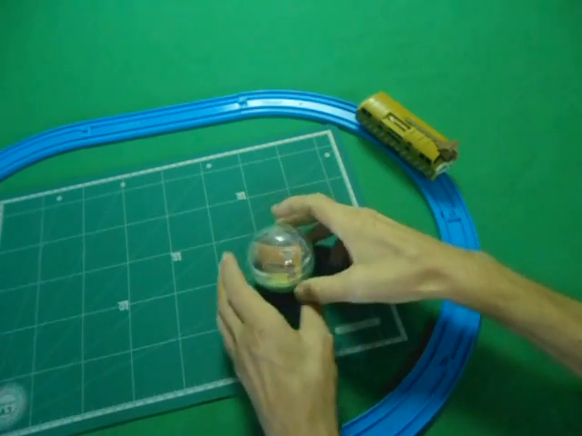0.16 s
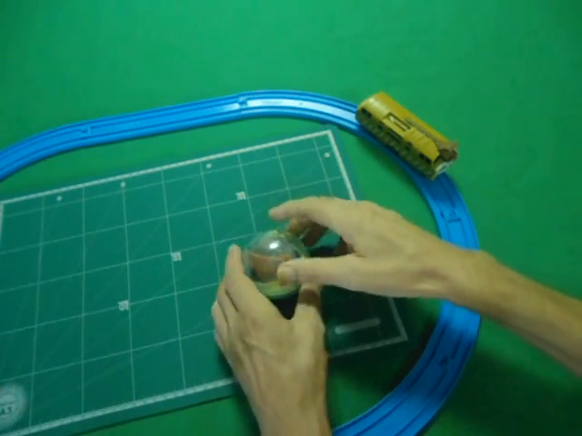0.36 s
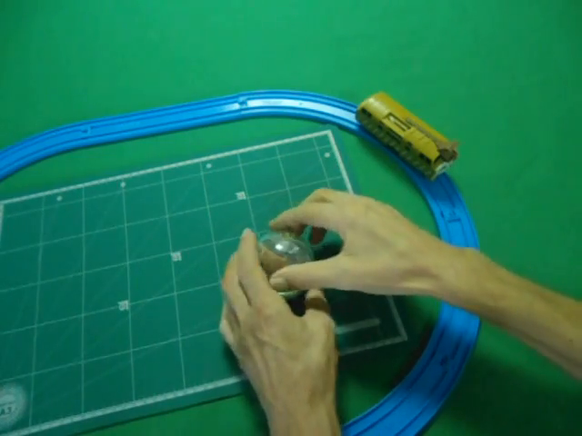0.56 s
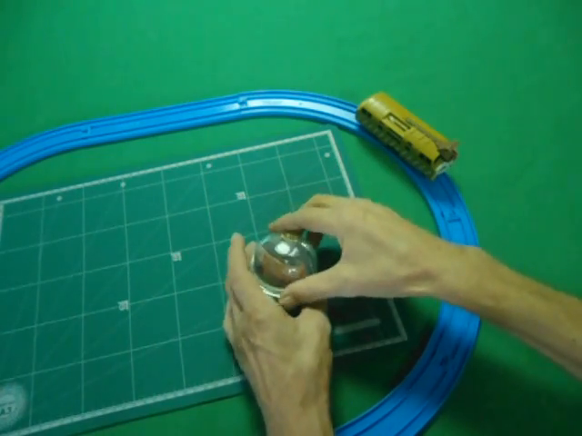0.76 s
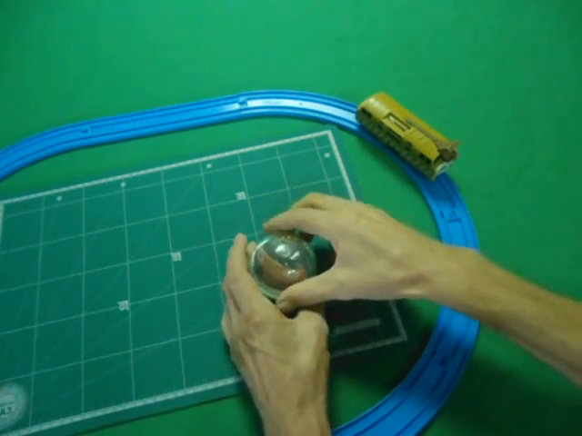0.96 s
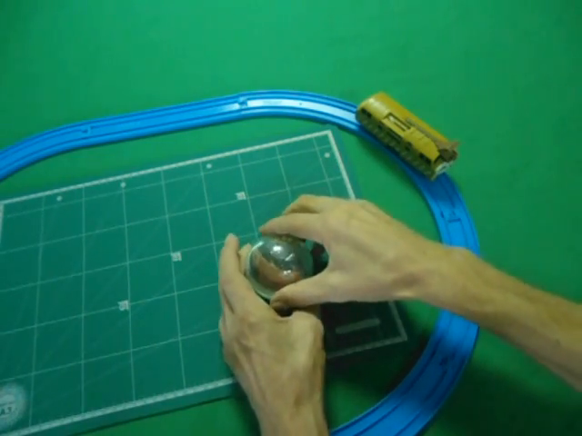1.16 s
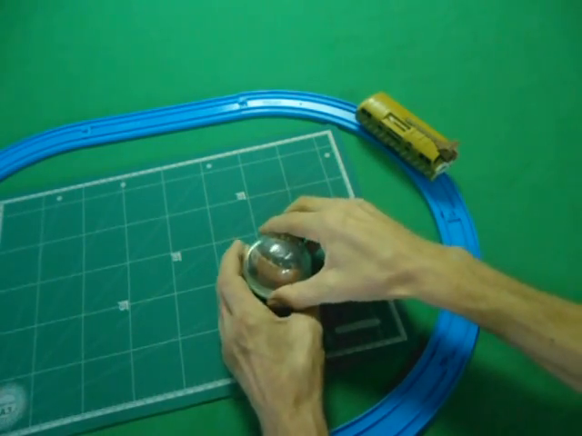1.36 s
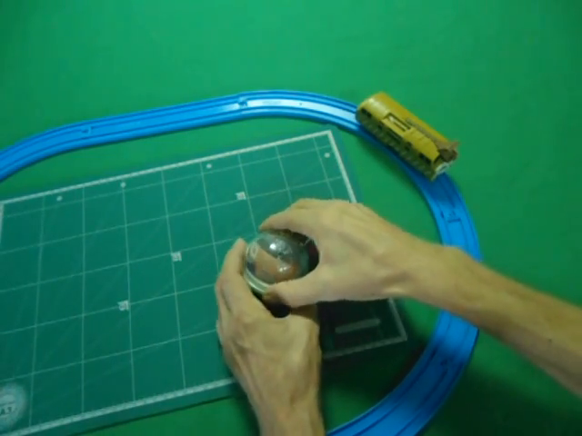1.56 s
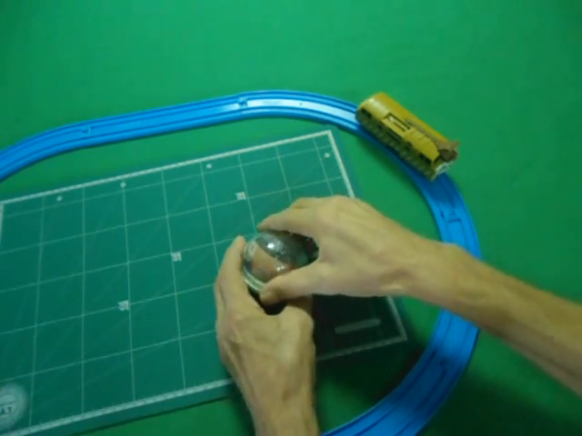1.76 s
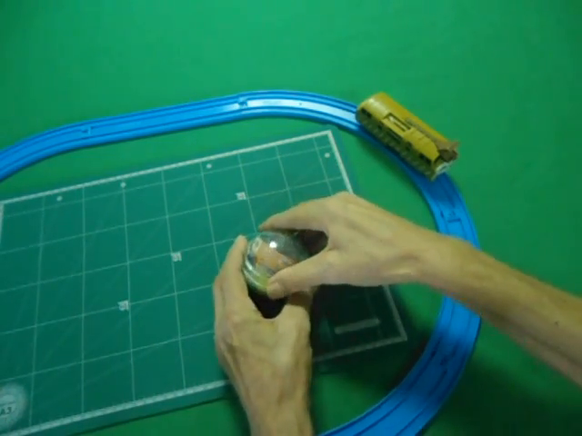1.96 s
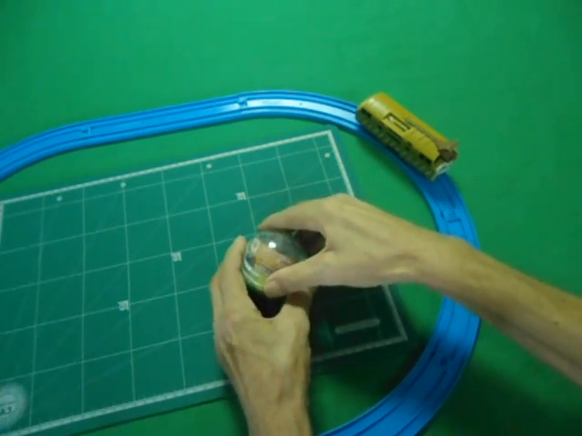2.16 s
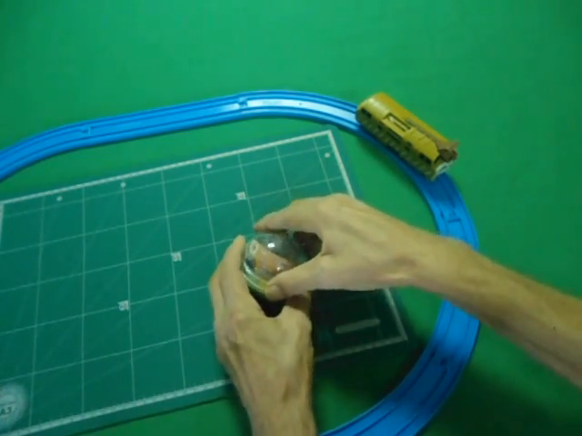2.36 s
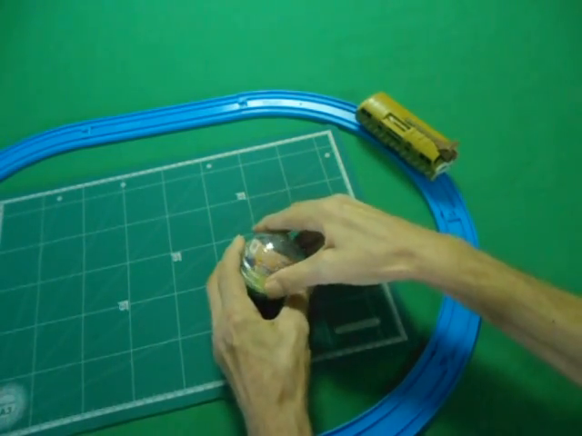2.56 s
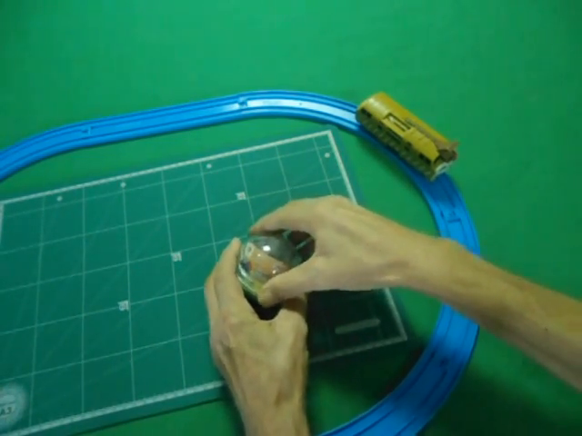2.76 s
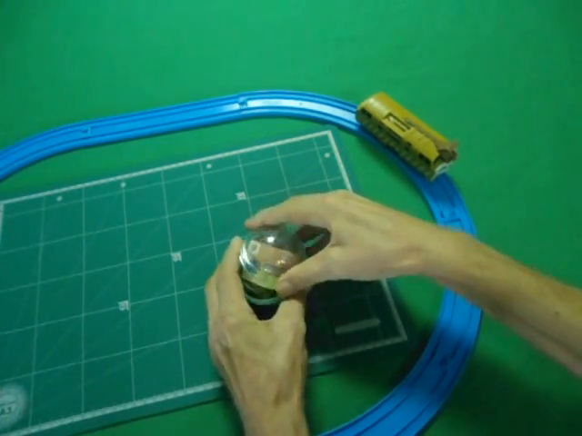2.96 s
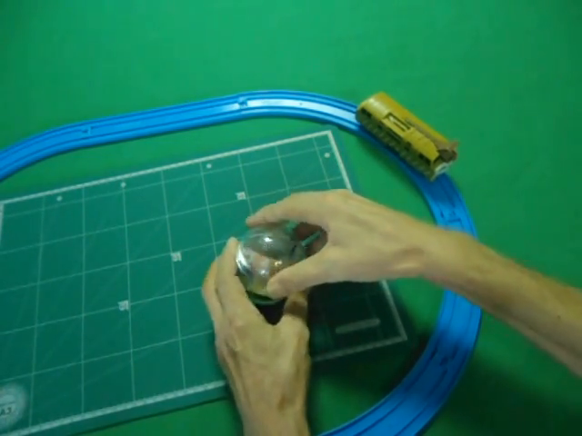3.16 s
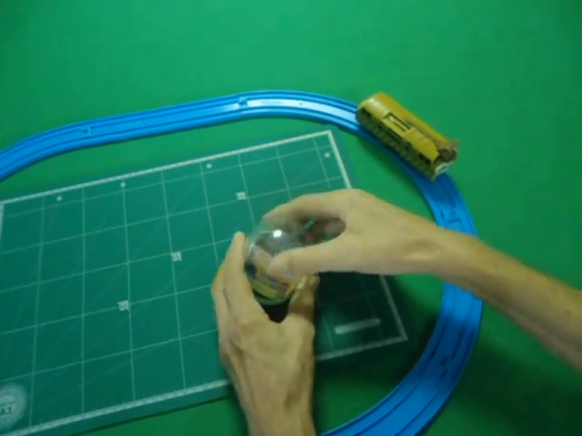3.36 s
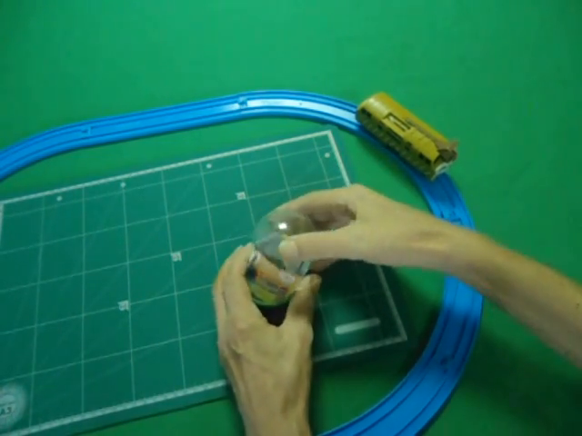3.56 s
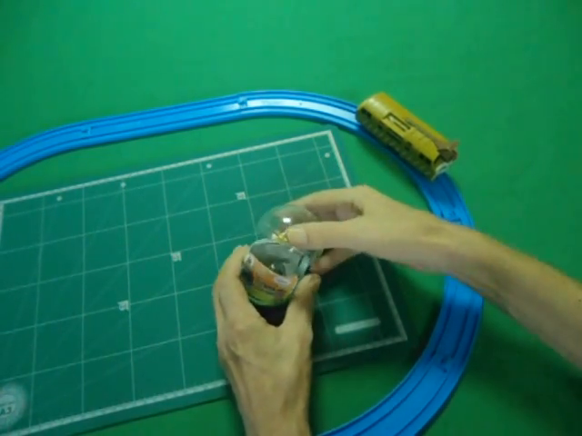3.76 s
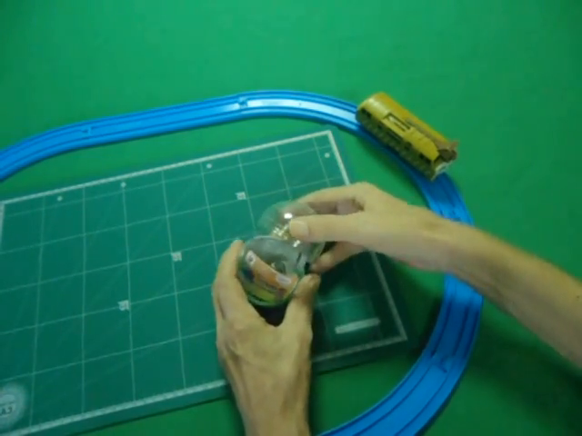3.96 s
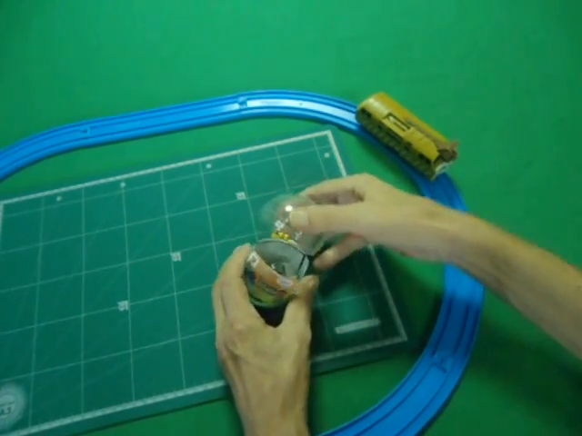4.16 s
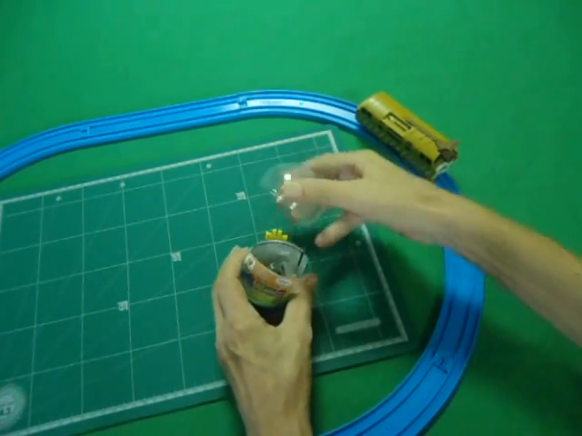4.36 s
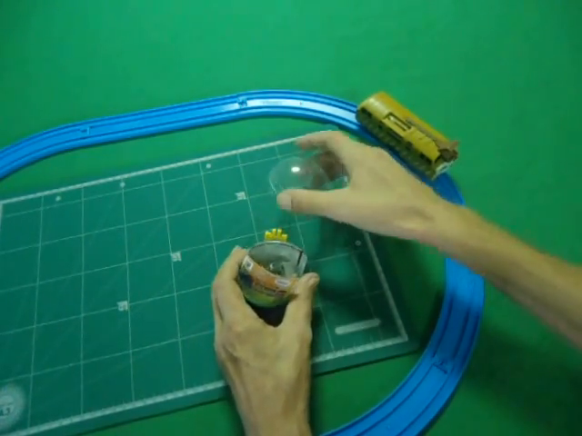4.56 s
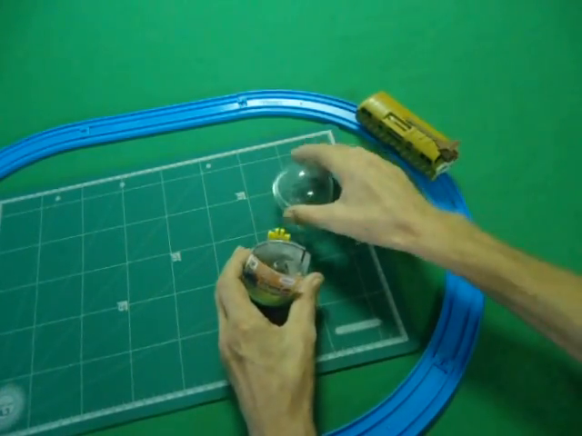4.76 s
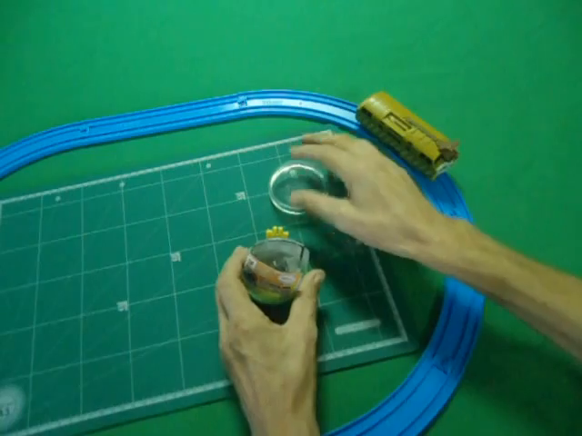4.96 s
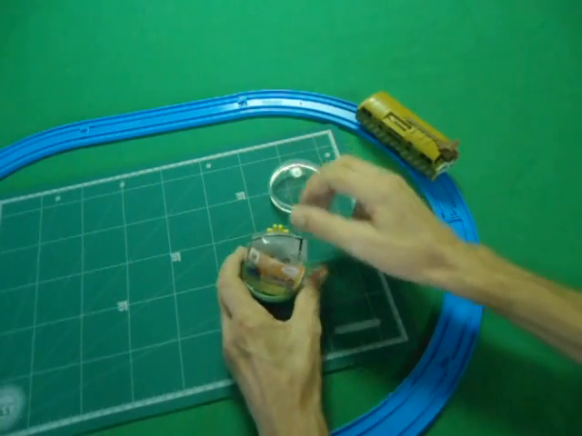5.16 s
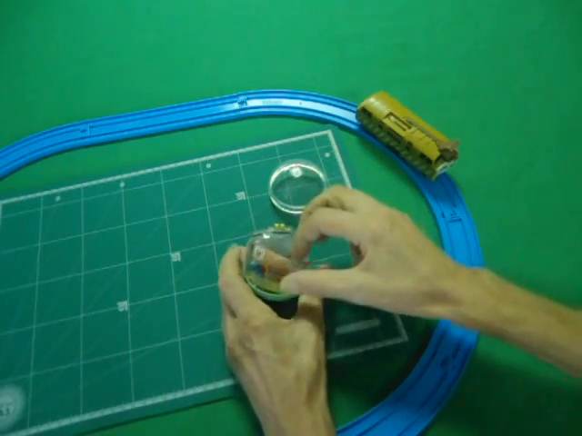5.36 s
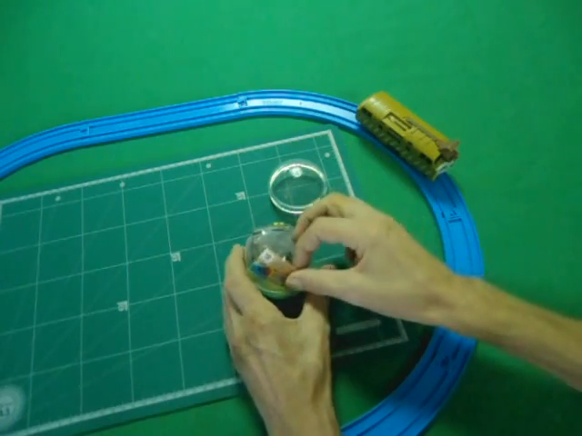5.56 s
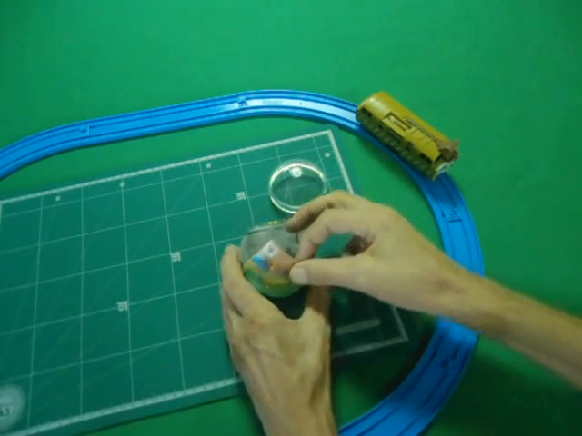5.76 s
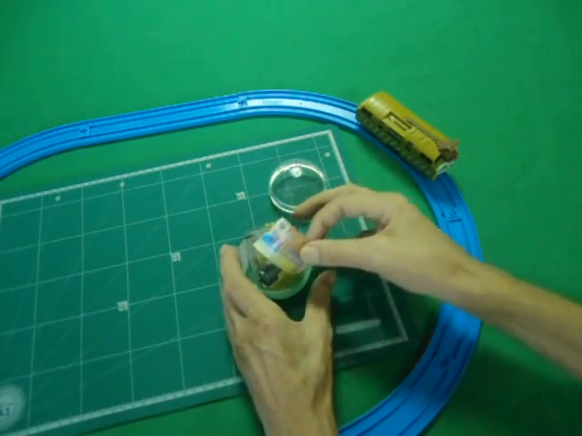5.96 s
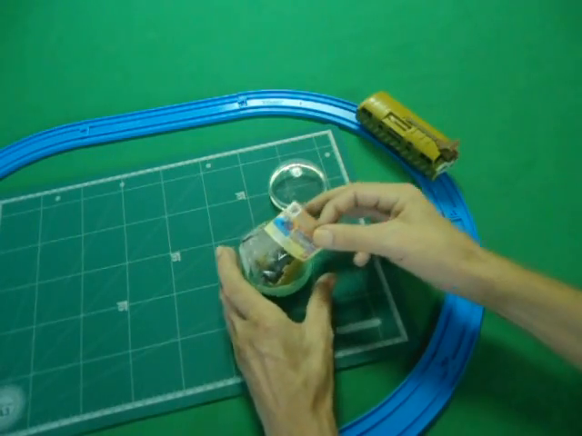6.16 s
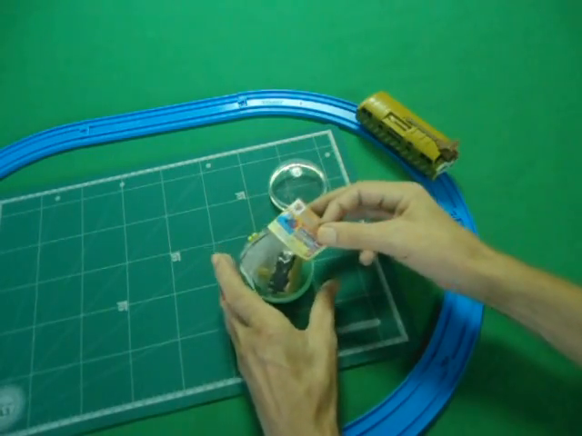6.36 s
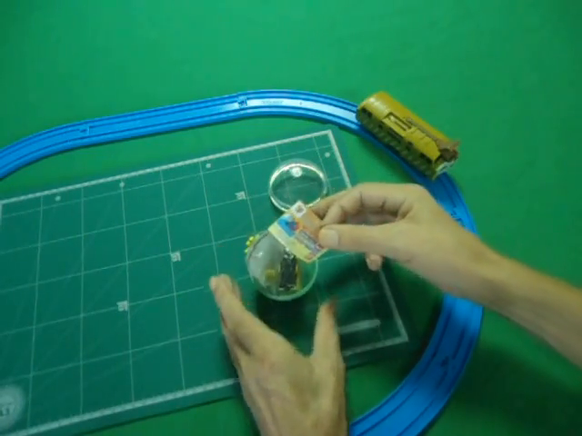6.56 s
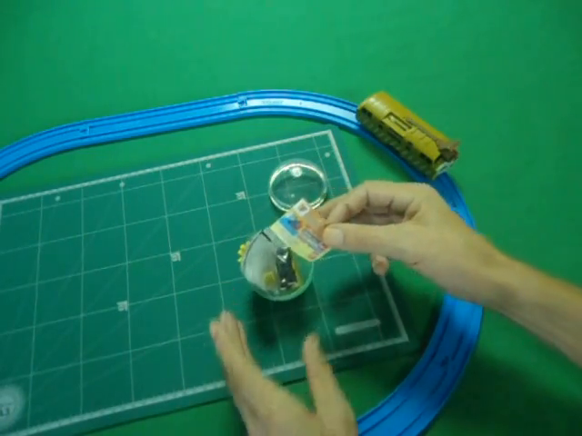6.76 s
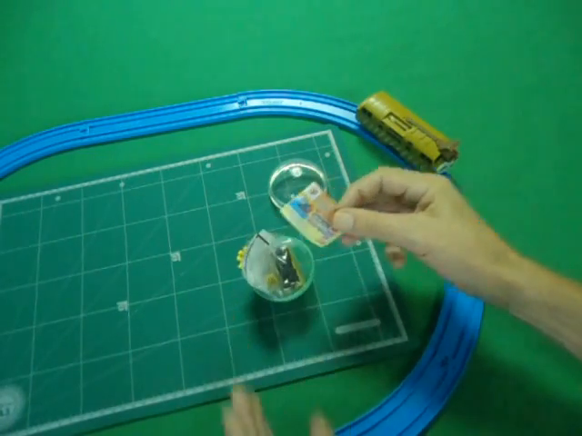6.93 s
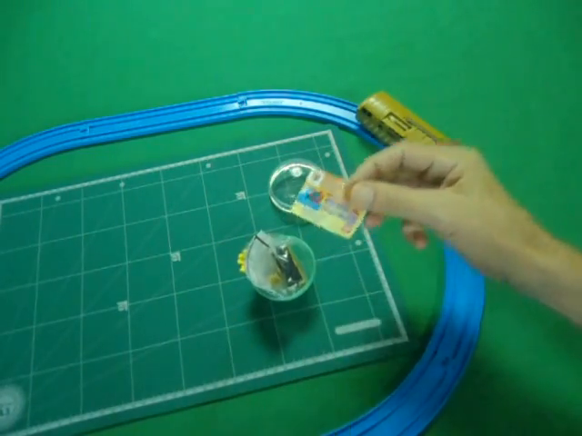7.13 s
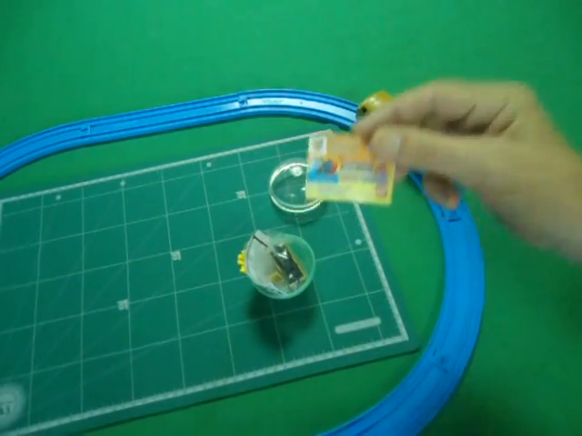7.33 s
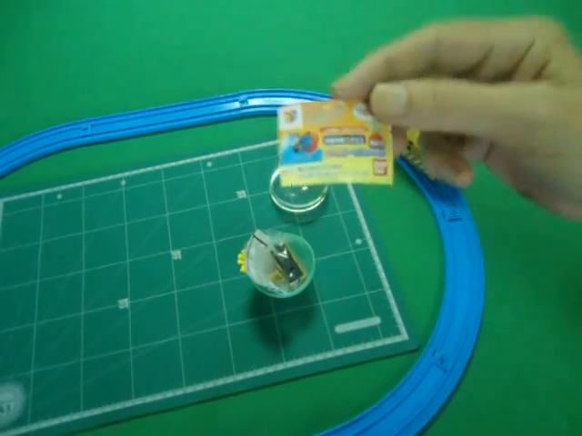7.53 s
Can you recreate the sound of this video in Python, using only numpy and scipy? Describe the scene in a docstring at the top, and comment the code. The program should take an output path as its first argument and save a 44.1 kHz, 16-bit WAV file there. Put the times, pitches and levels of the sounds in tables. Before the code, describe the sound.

Low motor hum and faint birds in a small room, a sharp plastic crack, light scraping, a loud hollow lid clack, finally paper pops and a thump.

```python
"""A motor hums low and steady in a small room; fingers rub softly on plastic, and faint outdoor bird calls chatter.
At 3 s a plastic toy capsule is pried open: jerks of the seam make noise cracks and ringing air pops.
The lid is scraped off with knocks and grainy noise, and near 5 s it drops on a cutting mat with a hollow
snap and bounces: clicks, trapped air, table and lid wall, each made of short noise and fading tones.
After 7 s a paper slip is lifted out, with falling pops and dull jolts of the table."""
import sys
import numpy as np
from scipy import signal
from scipy.fft import rfft, irfft, next_fast_len
from scipy.io import wavfile

SR = 44100
rng = np.random.default_rng(int(sys.argv[2]) if len(sys.argv) > 2 else 0)


def wav_out(sig):
    """Save sig, one row per channel (or a flat mono array), as 16-bit PCM at SR to the path in sys.argv[1]."""
    wavfile.write(sys.argv[1], SR, np.round(np.clip(np.atleast_2d(sig).T, -1, 1) * 32767).astype(np.int16))


N = 334851
TIME = np.arange(N) / SR
RING = TIME[:SR // 4]  # the clock of one short sound, in seconds
# In every name and setting below, t60 is the time in seconds to fade by 60 dB.


def amp(db):
    """Turns decibels into gain."""
    return 10 ** (np.asarray(db) / 20)


def evened(x):
    """Scales a sound to an rms of 1."""
    return x / np.sqrt(np.mean(x ** 2) + 1e-20)


def read_curve(points, hz):
    """Reads a table of frequency and value between its points, on a log-frequency axis."""
    table_hz, value = np.transpose(points)
    return np.interp(np.log(hz + 1), np.log(table_hz + 1), value)


def coloured(x, points):
    """Filters a sound by a table of frequency in Hz and gain in dB."""
    size = next_fast_len(len(x) + 1024)
    gain = amp(read_curve(points, np.fft.rfftfreq(size, 1 / SR)))
    return irfft(rfft(x, size) * gain, size)[:len(x)]


def band(hz, width, size):
    """Makes noise of rms 1 around one frequency; the gain halves width Hz away from it."""
    f = np.fft.rfftfreq(size, 1 / SR)
    resonance = 1 / (1 + ((f - hz) / width) ** 2)
    return evened(irfft(rfft(rng.standard_normal(size)) * resonance, size))


def drift(rate):
    """Makes a slow random wander of rms 1, with rate new values a second."""
    return evened(np.interp(TIME * rate, np.arange(400), rng.standard_normal(400)))


def add(mix, start, sound):
    """Lays a sound into the mix at start seconds."""
    part = mix[round(start * SR):][:len(sound)]
    part += sound[:len(part)]


def mode(hz, t60, rise):
    """One vibration that starts softly and dies away."""
    return np.sin(2 * np.pi * hz * RING) * amp(-60 * RING / t60) * (1 - np.exp(-RING / rise))


def burst(t60):
    """A dying puff of noise."""
    return rng.standard_normal(len(RING)) * amp(-60 * RING / t60)


def stroke(start, length, rise, t60):
    """A loudness shape that rises, holds until its length is over and dies away."""
    age = TIME - start
    return np.clip(age / rise, 0, 1) * amp(-60 * np.maximum(age - length, 0) / t60)


# The noise of the room's air. Each row: frequency in Hz, level in dB per Hz.
AIR_COLOUR = [(12, -57), (32, -53.5), (60, -61.5), (115, -65.5), (165, -64), (215, -69), (300, -72.5),
              (420, -75), (700, -81.5), (1100, -83), (1700, -88.5), (3000, -91), (4300, -94), (6500, -97.5)]


def room_air():
    """Steady noise, mostly low, as the air of the room."""
    return coloured(rng.standard_normal(N), AIR_COLOUR) * np.sqrt(SR / 2)


HUM_HZ, HUM_WAVER_DB = 47.84, 1.52  # average pitch; typical wander of each order's level
# The motor's steady orders. Each row: multiple of the hum's pitch, rms level in dB before it wavers.
STEADY_ORDERS = [(2, -41), (4, -57), (5, -49), (6, -60.5)]
# Two orders that swell and fade.
# Each row: time in seconds, rms level of the 1st order in dB, of the 3rd in dB, both before they waver.
SWELLING_ORDERS = [(0, -32, -46), (1.15, -31.5, -55.5), (1.48, -38.5, -60), (1.8, -33, -42.5),
                   (2.12, -38.5, -42), (2.62, -27.5, -44.5), (3.05, -39.5, -45), (3.55, -37, -40.5),
                   (4.1, -36.5, -49), (6.1, -38, -46.5), (7.5, -30, -42)]


def motor_hum():
    """A turning motor sounds at multiples of one slightly wandering pitch."""
    turn = 2 * np.pi * np.cumsum(HUM_HZ * (1 + 0.004 * drift(rate=5))) / SR
    s, first_db, third_db = np.transpose(SWELLING_ORDERS)
    levels = [*STEADY_ORDERS, (1, np.interp(TIME, s, first_db)), (3, np.interp(TIME, s, third_db))]
    orders = np.zeros(N)
    for multiple, db in levels:
        level = amp(db + HUM_WAVER_DB * drift(rate=7))
        orders += level * np.sin(round(multiple) * turn + rng.uniform(0, 2 * np.pi))
    return np.sqrt(2) * orders  # a sine's peak is root 2 times its rms


WHIR_RISE_S, WHIR_SAG_DB_PER_S, WHIR_T60_S = 0.15, 4.5, 2.2
# The faint whir. Each row: start in seconds, length in seconds, level in dB before it sags.
WHIRS = [(1.05, 2, -56.5), (3.553, .85, -53), (6.45, 1, -58)]


def whir():
    """A narrow band of noise comes and goes, sagging from each start."""
    loudness = np.zeros(N)
    for start, length, db in WHIRS:
        sagging = amp(db - WHIR_SAG_DB_PER_S * (TIME - start))
        loudness += sagging * stroke(start, length, WHIR_RISE_S, WHIR_T60_S)
    return band(hz=1166, width=69, size=N) * loudness


FIRST_GAP_S, LAST_GAP_S, SLOWING_SYLLABLES = .067, .105, 7  # the gaps grow from first towards last
RATTLE_ENDS_DB, RATTLE_SKEW = -3.5, .55  # ends against the loudest; below 1, the peak comes early


def syllables(start, end, db):
    """Times and levels of one rattle, which slows down under an arch of loudness."""
    gaps = LAST_GAP_S + (FIRST_GAP_S - LAST_GAP_S) * np.exp(-np.arange(20) / SLOWING_SYLLABLES)
    ages = np.cumsum(np.r_[0, gaps])
    ages = ages[ages < end - start]
    arch = np.sin(np.pi * (ages / (end - start)) ** RATTLE_SKEW)
    return zip(start + ages, db + RATTLE_ENDS_DB * (1 - arch))


# The bird's rattles. Each row: start in seconds, end in seconds, level in dB at the top of the arch.
RATTLES = [(0.858, 1.94, -47.5), (1.953, 2.11, -49.5)]
# The colour of its harsh voice. Each row: frequency in Hz, relative level in dB.
RATTLE_COLOUR = [(2600, -18), (3550, -8.5), (3820, 2.5), (4120, 0), (4380, 3.5), (4700, 1.5), (4950, -0.5),
                 (5500, 0), (6200, -1.5), (7000, -1.5), (8000, -39)]


def bird_rattles():
    """A harsh noise syllable repeats, never quite alike, smeared by distance into a faint tail."""
    out = np.zeros(N)
    age = RING / 0.026
    envelope = age * np.exp(1 - age) + amp(-21) * amp(-60 * RING / .5)
    syllable = rng.standard_normal(len(RING))
    for rattle in RATTLES:
        for start, db in syllables(*rattle):
            varied = syllable + .5 * rng.standard_normal(len(RING))
            rasp = evened(coloured(varied, RATTLE_COLOUR))
            add(out, start, amp(db) * rasp * envelope)
    return out


# The faint chirps. Each row: start in seconds, twice the time to the peak in seconds,
# centre frequency in Hz, level in dB.
CHIRPS = [(0.204, 0.038, 4530, -57), (0.437, 0.22, 3280, -57.5), (0.687, 0.098, 2460, -56),
          (3.902, 0.075, 4000, -55), (5.161, 0.067, 4170, -57), (5.701, .06, 4080, -59),
          (5.908, .08, 4450, -56.5), (7.261, 0.059, 4000, -58.5)]


def bird_chirps():
    """Thin bands of noise swell and fade, blurred rather than pure in pitch."""
    out = np.zeros(N)
    for start, length, hz, db in CHIRPS:
        age = 2 * RING / length
        swell = (age * np.exp(1 - age)) ** 2
        add(out, start, amp(db) * swell * band(hz, width=0.056 * hz, size=len(RING)))
    return out


RUB_RISE_S, RUB_T60_S = 0.044, .42
# Fingers rub on plastic and paper. Each row: start in seconds, length in seconds, level in dB.
RUBS = [(.11, 0.098, -48), (3.1, 0.041, -51), (3.8, .1, -55), (4.097, .22, -48), (7.246, .04, -43),
        (7.367, 0.085, -47)]
# The colour of the rubbing. Each row: frequency in Hz, relative level in dB.
SKIN_COLOUR = [(100, -7), (350, 5.5), (800, 1.5), (1600, -6.5), (3000, -13), (6000, -15)]


def rubbing():
    """Skin friction is noise with grainy, random loudness each time the grip shifts."""
    grain = coloured(rng.standard_normal(N), SKIN_COLOUR) * amp(2.5 * band(hz=30, width=80, size=N))
    strokes = sum(amp(db) * stroke(start, length, RUB_RISE_S, RUB_T60_S) for start, length, db in RUBS)
    return evened(grain) * strokes


# The hands jolt the table.
# Each row: start in seconds, level in dB, frequency in Hz, rise in seconds, t60 in seconds.
JOLTS = [(3.007, -20, 32.6, 0.0051, 0.37), (7.44, -1, 43.4, 0.016, 0.071), (7.452, -10, 92, .005, 0.094),
         (7.454, -24.5, 269, .002, 0.053)]


def table_jolts():
    """Each jolt is a dull vibration that soon dies."""
    out = np.zeros(N)
    for start, db, hz, rise, t60 in JOLTS:
        add(out, start, amp(db) * mode(hz, t60, rise))
    return out


# The paper slip buckles. Each row: start in seconds, level in dB, starting pitch in Hz,
# pitch it falls towards in Hz, time to its peak in seconds.
PAPER_POPS = [(7.2515, -24, 770, 526, 0.0069), (7.4293, -16.5, 710, 475, 0.0039)]


def paper_pops():
    """Bent paper pops, and its pitch sags as the bend relaxes."""
    out = np.zeros(N)
    for start, db, start_hz, end_hz, peak in PAPER_POPS:
        age = RING / peak
        turn = 2 * np.pi * np.cumsum(end_hz + (start_hz - end_hz) * np.exp(-age)) / SR
        swell = (age * np.exp(1 - age)) ** 2.4
        add(out, start, amp(db) * swell * (np.sin(turn) + amp(-20.0) * np.sin(2 * turn)))
    return out


FIZZ_HZ = 5100  # the bright edge of every scrape


def touch(hz, length, fizz_db):
    """A dead little knock with a grainy scrape, which fades by 20 dB in its length."""
    size = len(RING)
    knock = amp(3.5) * mode(hz, t60=0.0056, rise=.0001)
    scrape = band(hz, width=.38 * hz, size=size) + amp(fizz_db) * band(FIZZ_HZ, width=960, size=size)
    grain_db = 2 * band(hz=200, width=280, size=size)
    return knock + scrape * amp(grain_db - 20 * RING / length)


# Fainter touches fall at random while the lid is worked free; their pitch varies around FIDDLE_HZ.
FIDDLE_FROM_S, FIDDLE_TO_S, FIDDLE_DB, FIDDLE_HZ, FIDDLE_LENGTH_S = 3.8, 4.32, -49, 3700, .018
# Plastic and paper touch. Each row: start in seconds, level in dB, centre frequency in Hz,
# length of the scrape in seconds, level of its bright edge in dB against the scrape.
TOUCHES = [(0.603, -38.5, 994, 0.016, -8), (3.122, -38, 1500, 0.026, -14), (3.207, -35, 1320, 0.042, -18),
           (3.299, -39.5, 1900, 0.031, -1.5), (3.338, -27, 1000, 0.0055, -22), (3.372, -45, 1300, .01, -20),
           (3.680, -32, 1610, 0.015, -13.5), (4.3326, -31.5, 1500, 0.0063, -11),
           (4.3389, -33.5, 2580, 0.012, -13), (4.345, -35.5, 1750, 0.018, -7),
           (5.53, -44.5, 2160, 0.015, -18), (7.254, -39.5, 1970, 0.016, -11),
           (7.460, -40.5, 2350, 0.012, -6)]


def handling():
    """Clear touches of plastic and paper, and a scatter of faint ones as the lid comes away."""
    out = np.zeros(N)
    for start, db, hz, length, fizz_db in TOUCHES:
        add(out, start, amp(db) * touch(hz, length, fizz_db))
    for when, pitch in rng.random(size=(5, 2)):
        start = FIDDLE_FROM_S + when * (FIDDLE_TO_S - FIDDLE_FROM_S)
        hz = FIDDLE_HZ * 2 ** (pitch - .5)
        add(out, start, amp(FIDDLE_DB) * touch(hz, FIDDLE_LENGTH_S, fizz_db=-8))
    return out


POP_T60_S = 0.019
# Between the jerks the lip grinds harder and harder; GRIND_DB is reached as it clears the catch.
GRIND_FROM_S, GRIND_CLEARS_S, GRIND_T60_S = 2.974, 3.004, 0.13
GRIND_DB, GRIND_GROWTH_DB_PER_S = -23.5, 501  # the level is before colouring
# The seam lets go in jerks. Each row: start in seconds, level of the crack in dB before colouring,
# pitch of the air pop in Hz, level of the air pop in dB.
CRACKS = [(2.9742, -19, 589, -10), (2.9922, -20.5, 780, -12), (2.9950, -13.5, 980, -7.5),
          (2.9983, -22, 1280, -15), (3.0066, -22.5, 830, -11), (3.0090, -33, 1104, -12)]
# The colour of the cracking seam. Each row: frequency in Hz, gain in dB.
SEAM_COLOUR = [(150, 5), (600, 8), (1100, 13), (1800, 2.5), (2500, 1.5), (4000, -2.5), (6000, -3)]
# The half-shut capsule's wall, damped by the fingers.
# Each row: frequency in Hz, level in dB against the crack's level, t60 in seconds.
HELD_WALL = [(2280, -9, .018), (2600, -7.5, .016), (3570, 4, .007)]


def seam():
    """The lip grinds over its catch in jerks; each cracks, pops the air inside and rings the damped wall."""
    cracks, rings = np.zeros((2, N))
    wall = sum(amp(db) * mode(hz, t60, rise=0.0006) for hz, db, t60 in HELD_WALL)
    for start, crack_db, pop_hz, pop_db in CRACKS:
        add(cracks, start, amp(crack_db) * burst(t60=0.014) * (1 - np.exp(-RING / 0.00017)))
        pop = amp(pop_db) * mode(pop_hz, POP_T60_S, rise=0.00066)
        add(rings, start, pop + amp(crack_db) * wall)
    # tiny slips, thousands a second
    slips = evened(rng.choice([-1, 1], N) * (rng.random(N) < 2500 / SR))
    pressure = amp(GRIND_DB + GRIND_GROWTH_DB_PER_S * np.minimum(TIME - GRIND_CLEARS_S, 0))
    hold = stroke(GRIND_FROM_S, GRIND_CLEARS_S - GRIND_FROM_S, rise=.004, t60=GRIND_T60_S)
    return coloured(cracks + slips * pressure * hold, SEAM_COLOUR) + rings


# The lid's wall. Each row: frequency in Hz, level in dB against the bounce's wall level, t60 in seconds.
LID_WALL = [(2290, -17, 0.044), (2830, -15.5, 0.026), (3170, -18.5, 0.024), (3620, -16, 0.036),
            (3710, -18.5, 0.089), (4460, -29, .04)]


def lid_wall():
    """The ring of the lid's stiff plastic wall."""
    return sum(amp(db) * mode(hz, t60, rise=.0001) for hz, db, t60 in LID_WALL)


def click(width):
    """One sharp push and rebound of air, with a time scale of width seconds."""
    age = RING / width
    return (1 - age) * np.exp(-age)


AIR_HZ, AIR_SAG_HZ_PER_S = 1110, 2360  # pitch at the first hit; it sounds lower as the lid settles
# A harder blow squeezes the air out sooner: t60 at an air level of 0 dB, and how strongly it shrinks.
AIR_T60_S, AIR_CHOKE = .011, 0.36
# The lid's rim meets the mat. Each row: start in seconds, then settings in dB for
# the contact, the trapped air and the wall's ring.
BOUNCES = [(4.9425, -5.5, 13, -5.5), (4.9520, -26.5, -7.5, -31), (4.9563, -29, -1.5, -41),
           (4.9647, -32.5, -21, -13), (5.0103, -33.5, -5.5, -19), (5.0168, -38, -13, -42),
           (5.0503, -21, -8, -15.5), (5.0558, -32, -6.5, -31), (5.0848, -22, -9, -29)]
# The table top under the mat.
# Each row: frequency in Hz, level in dB before scaling by the blow, t60 in seconds.
TABLE_TOP = [(138, -32.5, 0.098), (206.5, -30, 0.15), (317, -22.5, 0.061), (494, -26.5, 0.065),
             (648, -10, 0.012)]


def lid():
    """The dome lands and rocks, shaking the table; its air sounds lower as the gap to the mat closes."""
    out = np.zeros(N)
    table = sum(amp(db) * mode(hz, t60, rise=0.0024) for hz, db, t60 in TABLE_TOP)
    for start, contact_db, air_db, wall_db in BOUNCES:
        contact = amp(contact_db) * (amp(11.5) * click(width=.00004) + burst(t60=0.0076))
        air_hz = AIR_HZ - AIR_SAG_HZ_PER_S * (start - BOUNCES[0][0])
        air_t60 = AIR_T60_S * amp(-AIR_CHOKE * air_db)
        air = amp(air_db) * mode(air_hz, air_t60, rise=0.0002)
        thud = amp(0.67 * air_db) * table  # the thud varies less than the air pop from blow to blow
        add(out, start, contact + air + thud + amp(wall_db) * lid_wall())
    return out


# How fast the echo dies. Each row: frequency in Hz, t60 in seconds.
ECHO_DECAY = [(150, 0.6), (500, 0.48), (1000, 0.42), (2500, 0.66), (6000, 0.6)]
# The colour of the echo. Each row: frequency in Hz, relative level in dB.
ECHO_COLOUR = [(150, 2), (350, -2.5), (600, 0.5), (1100, 3), (2000, -0.5), (4000, -2.5), (6000, -1.5)]


def room(x):
    """Sparse reflections of random sign build up and die away band by band."""
    size = SR * 3 // 4
    taps = rng.choice([-1, 1], size) * (rng.random(size) < 3000 / SR)
    hz, t, bands = signal.stft(taps, SR, nperseg=256)
    fade_db = 60 * t / read_curve(ECHO_DECAY, hz)[:, None]
    bands = bands * amp(read_curve(ECHO_COLOUR, hz)[:, None] - fade_db)
    build_up = np.clip((TIME[:size] - .004) / 0.0078, 0, 1)
    tail = signal.istft(bands, SR, nperseg=256)[1][:size] * build_up
    return signal.fftconvolve(x, tail / np.linalg.norm(tail))[:N]


def scene():
    """Sums all sources, the near ones with their share of the room's echo."""
    crack, drop, touches = seam(), lid(), handling()
    knocks = table_jolts() + paper_pops()
    echo = room(amp(-9.0) * crack + amp(-11.5) * drop + amp(-9.0) * touches + amp(-16.5) * knocks)
    near = crack + drop + touches + knocks + echo + rubbing()
    background = motor_hum() + room_air() + whir() + bird_rattles() + bird_chirps()
    return (near + background)[None]


EDGE_HZ = 7000  # the upper band limit
# The dull microphone. Each row: frequency in Hz, gain in dB.
MICROPHONE_COLOUR = [(4000, 0), (5050, -1.5), (5450, -12), (6100, -11), (6600, -24.5), (7100, -36.5)]


def record(dry):
    """A dull little microphone rounds off the loudest peaks; then the band is limited."""
    limited = .96 * dry[0] / (1 + dry[0] ** 8) ** (1 / 8)
    heard = coloured(limited, MICROPHONE_COLOUR)
    low_pass = signal.firwin(511, EDGE_HZ, window=("kaiser", 9), fs=SR)
    return signal.oaconvolve(heard, low_pass, "same")[None]


dry = scene()
out = record(dry)
wav_out(out)
```